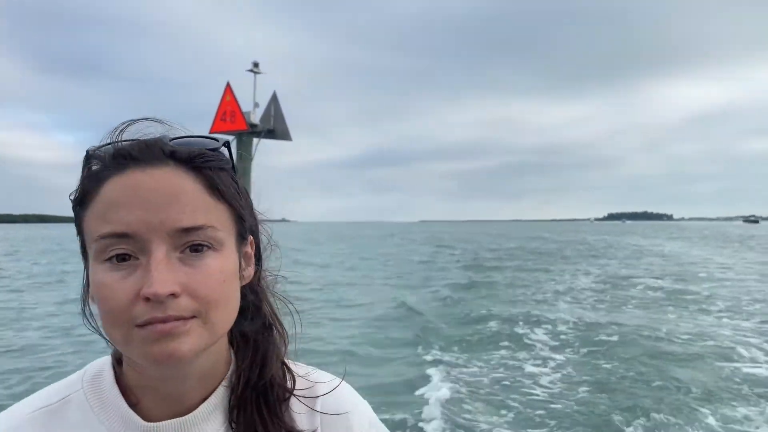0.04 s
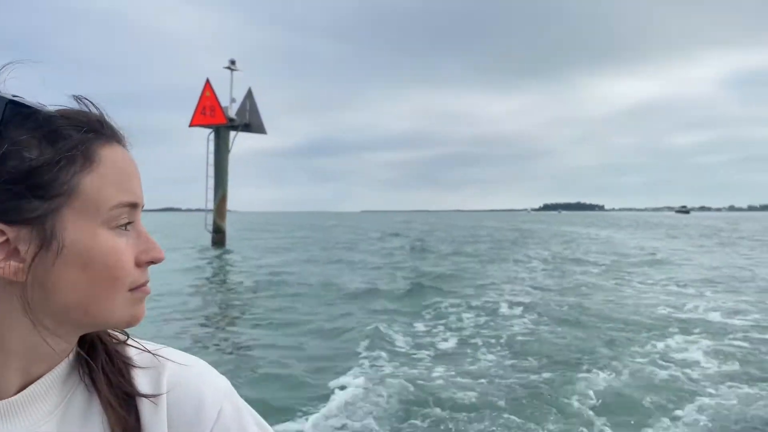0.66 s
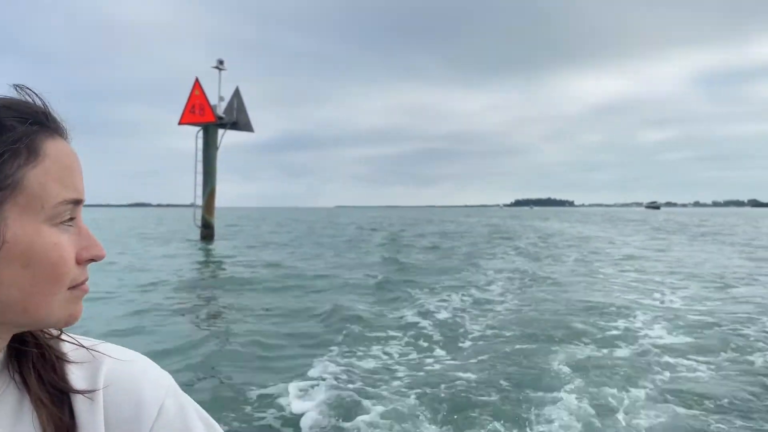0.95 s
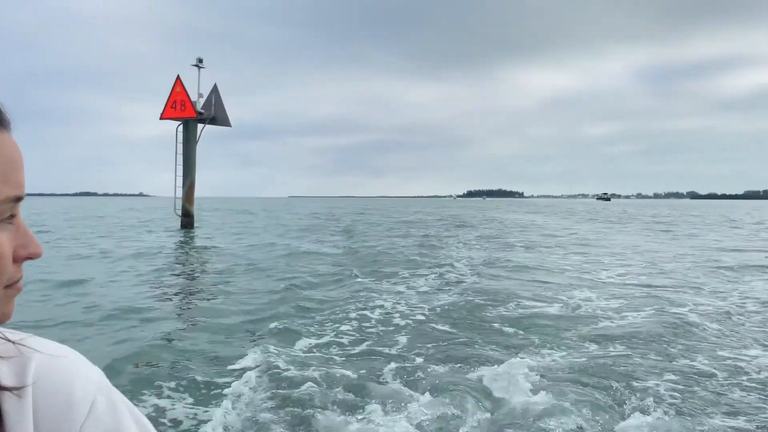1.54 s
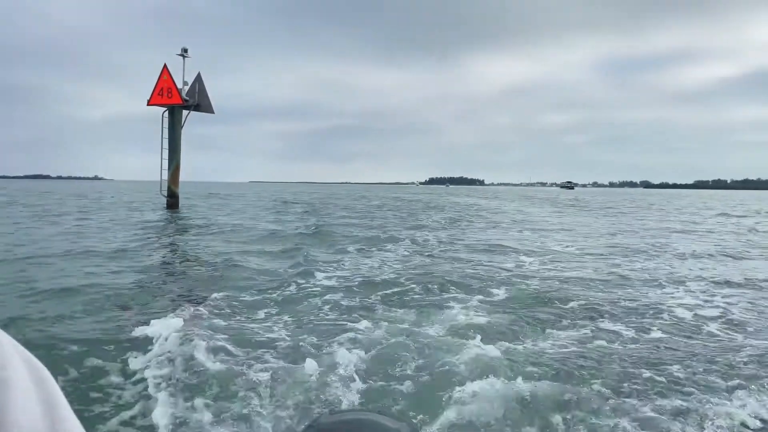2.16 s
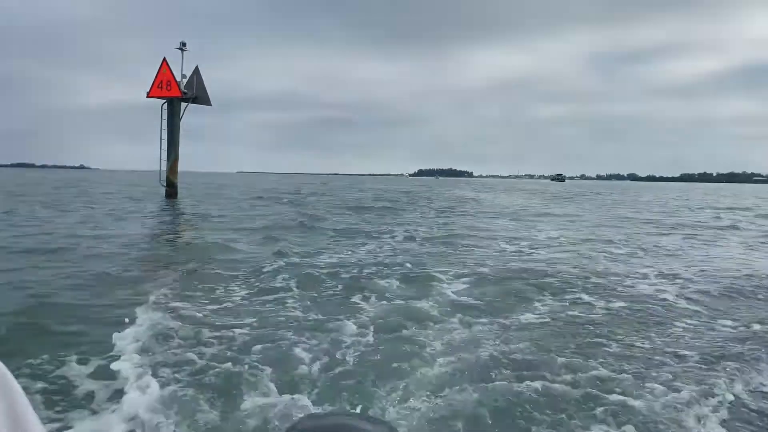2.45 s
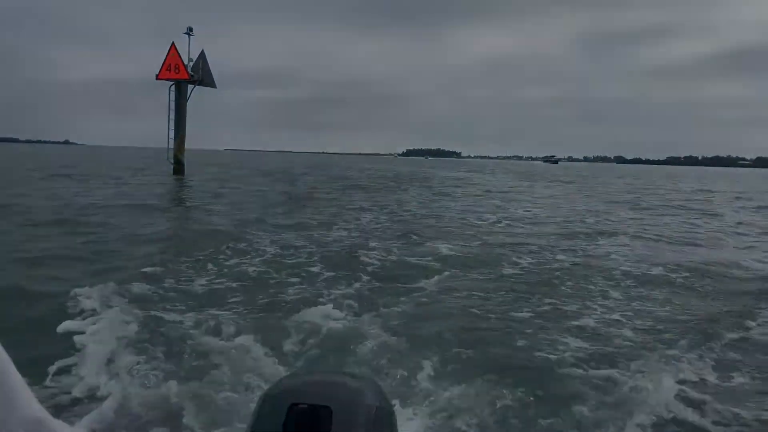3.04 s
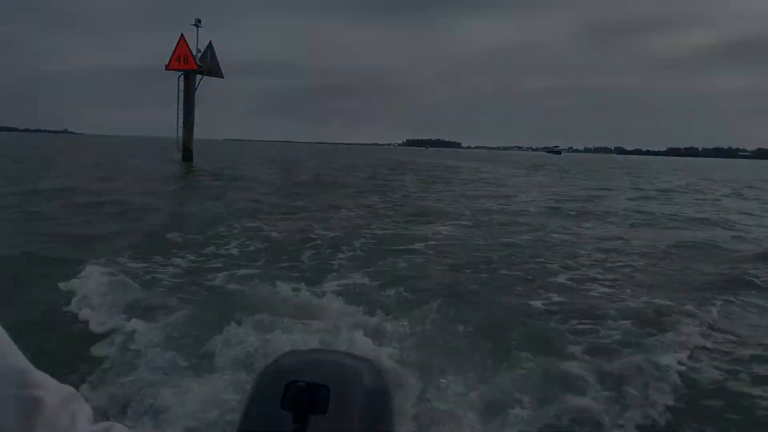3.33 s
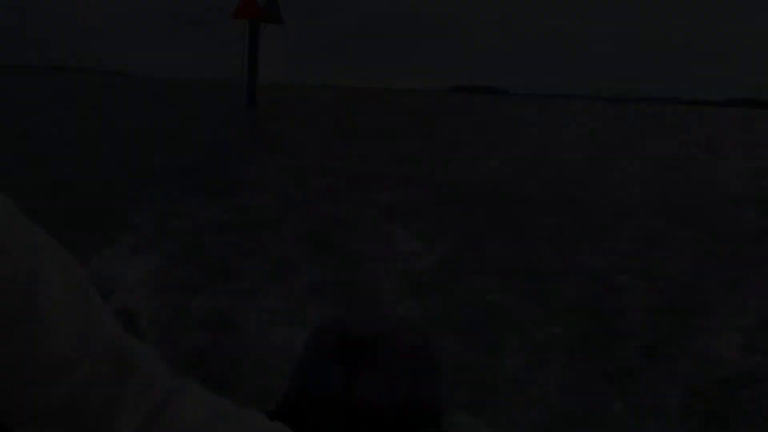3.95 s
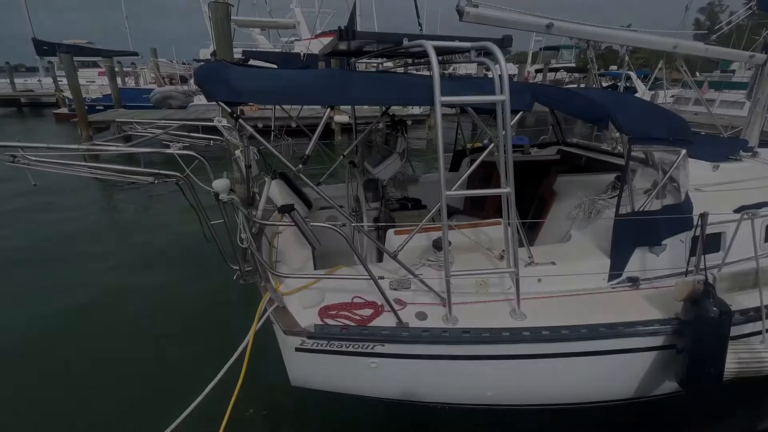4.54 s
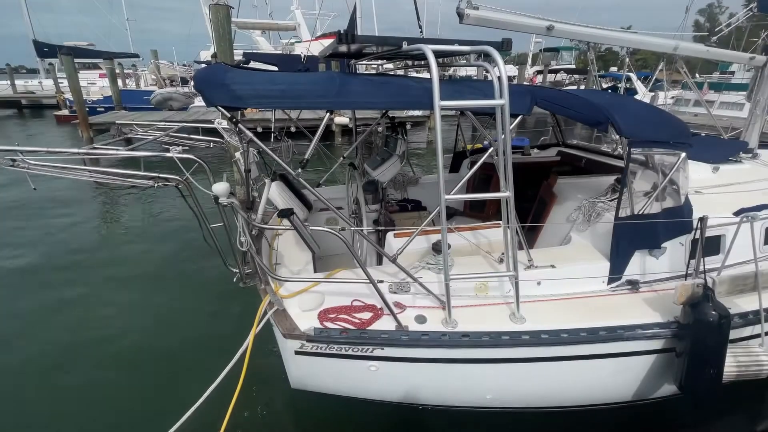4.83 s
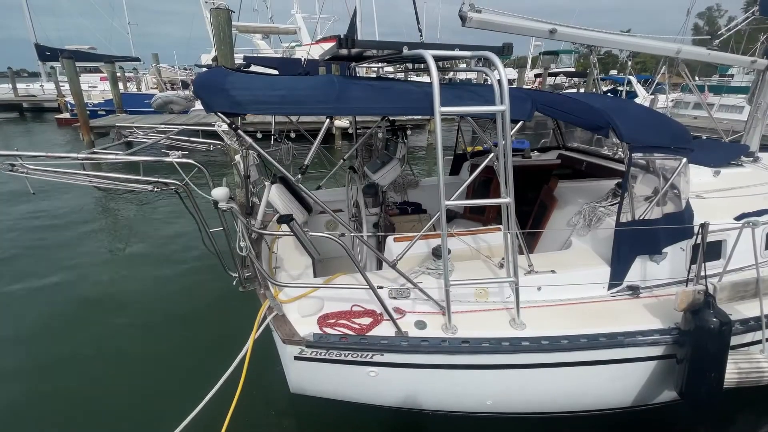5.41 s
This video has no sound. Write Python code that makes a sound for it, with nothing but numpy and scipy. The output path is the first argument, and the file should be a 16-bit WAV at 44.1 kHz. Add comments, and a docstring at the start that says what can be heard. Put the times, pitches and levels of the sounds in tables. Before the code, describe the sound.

A small outboard engine runs at a steady cruising speed, heard close from on board a dinghy. Its exhaust throbs and burbles under a mechanical clatter and faint whine, while the wake churns and spits, wavelets slap the hull and wind softly buffets the microphone. Near the end the ride fades into a quiet marina with a low hum and a few light metal clinks.

```python
"""On board a dinghy, pushed at cruising speed by a small twin-cylinder outboard.
Periodic firing makes the exhaust throb and burble under the stern; valve gear clatters, gears whine and
the shaken cowling growls. Turbulence and ringing bubbles make the wake churn and spit; wind buffets softly.
Wavelets slap the hull. Near the end the ride fades into a quiet marina with a low rumble, a far machine
hum and a few light clinks of metal fittings."""
import sys
import numpy as np
from scipy import signal
from scipy.fft import rfft, irfft, next_fast_len
from scipy.io import wavfile
from scipy.ndimage import uniform_filter1d

SR = 44100
rng = np.random.default_rng(int(sys.argv[2]) if len(sys.argv) > 2 else 0)


def bounce(signal):
    """Save signal as a 16-bit WAV file at the path given by the first command-line argument."""
    frames = np.transpose(np.atleast_2d(signal))
    limited = np.clip(frames, -1, 1)
    pcm = np.round(limited * 32767).astype(np.int16)
    wavfile.write(sys.argv[1], SR, pcm)


N = 246078
T = np.arange(N) / SR

# engine speed; one cycle is two crank turns and two firings: (time [s], cycle rate [Hz])
CYCLE_RATE = [(0.0, 26.47), (0.3, 26.47), (0.5, 26.72), (0.7, 26.85), (1.2, 26.85), (1.45, 26.89),
              (1.65, 26.77), (2.0, 26.77), (2.15, 26.9), (2.5, 27.03), (2.65, 26.78), (2.8, 26.73),
              (3.0, 26.84), (3.25, 26.76), (3.45, 26.92), (3.8, 26.82), (4.05, 26.72), (4.3, 26.78),
              (4.65, 26.9), (4.9, 26.65)]
# rasp of the exhaust's highest orders, which the burble follows: (time [s], level [dB])
RASP_LEVEL = [(0.05, -38.5), (0.35, -34.5), (0.5, -30.5), (0.75, -33.5), (0.97, -32.5), (1.12, -30),
              (1.33, -31.5), (1.5, -34), (1.72, -36), (1.87, -34.5), (2.35, -29.5), (2.75, -32),
              (2.95, -31.5), (3.15, -33), (3.4, -30.5), (3.58, -33.5), (3.75, -30.5), (3.9, -30),
              (4.05, -29.5), (4.25, -30.5), (4.5, -27.5), (4.8, -27)]
# common surge of clatter, growl and propeller churn: (time [s], level [dB])
SURGE_LEVEL = [(0.03, -44), (0.17, -41), (0.5, -42.5), (0.85, -41), (1.0, -39), (1.12, -41), (1.25, -38.3),
               (1.45, -39.5), (1.6, -43), (1.74, -38.8), (2.0, -42.5), (2.15, -40.5), (2.6, -41.5),
               (2.75, -40), (3.1, -39.8), (3.3, -42.5), (3.45, -42.5), (3.6, -41), (3.78, -43),
               (3.95, -40.5), (4.08, -41.3), (4.27, -39), (4.5, -41.5), (4.8, -39.5)]
# level difference between the channels: (frequency [Hz], left minus right [dB])
BALANCE = [(60, 5.5), (100, 2.5), (180, -1.5), (310, 9), (530, 6), (910, -4.5), (1560, -3), (2680, -2),
           (4620, 0), (7950, 0)]
# phase difference between the channels: (frequency [Hz], lead of the left [rad])
PHASE_LEAD = [(0, 0), (430, .2), (750, -.4), (1200, -.4), (1600, .4), (2050, 3.1), (3100, 6.8), (3550, 7.4),
              (4500, 12.5), (6700, 18.85)]


def amp(db):
    """Decibels to amplitude ratio."""
    return 10 ** (np.asarray(db) / 20)


def unit(x):
    """Normalisation to rms 1."""
    return x / np.sqrt(np.mean(x ** 2) + 1e-20)


def curve(points):
    """Linear interpolation of (time [s], value) points at every sample."""
    return np.interp(T, *np.transpose(points))


def read(points, hz):
    """Interpolation of (frequency [Hz], value) points on a logarithmic frequency axis."""
    f, value = np.transpose(points)
    return np.interp(np.log(hz + 1), np.log(f + 1), value)


def ramp(start_s, length_s):
    """A linear rise from 0 to 1."""
    return np.clip((T - start_s) / length_s, 0, 1)


def swell(start_s, length_s):
    """A critically damped envelope: a quick rise to 1 and a slower fall."""
    age = np.maximum(T - start_s, 0) / (length_s / 2)
    return age * np.exp(1 - age)


def burst(cycle, at, width):
    """A smooth periodic pulse; its position and width are fractions of the cycle."""
    return np.exp((np.cos(2 * np.pi * (cycle - at)) - 1) / (2 * np.pi * width) ** 2)


def noise():
    """Two uncorrelated white noises."""
    return rng.standard_normal((2, N))


def wander(rate_hz):
    """A random fluctuation of rms 1, band-limited to about rate_hz."""
    hz = np.fft.rfftfreq(4096, T[-1] / 4096)
    slow = irfft(rfft(rng.standard_normal(4096)) * np.exp(-(hz / rate_hz) ** 2))
    return unit(np.interp(T, np.linspace(0, T[-1], len(slow)), slow))


def strengths(count, spread_db, cap):
    """Random gains whose levels are exponentially distributed, up to cap times spread_db."""
    return amp(spread_db * np.minimum(rng.exponential(1, count), cap))


def add(mix, start_s, sound):
    """Superposition of a stereo sound on the mix."""
    part = mix[:, round(start_s * SR):][:, :sound.shape[1]]
    part += sound[:, :part.shape[1]]


def heard(pair, spectrum):
    """Partly coherent stereo, its mean at rms 1, shaped by (frequency [Hz], relative level [dB]) points."""
    # likeness of left and right: (frequency [Hz], correlation [-1 to 1])
    correlation = [(50, .985), (280, .98), (400, .87), (1050, .87), (1250, .68), (2100, .8), (2450, .3),
                   (2800, .7), (3800, .42), (4500, .78), (6000, .25), (7000, .35), (8200, -.2),
                   (11000, .85)]
    size = next_fast_len(N)
    hz = np.fft.rfftfreq(size, 1 / SR)
    a, b = rfft(pair, size)
    same = read(correlation, hz)
    mid, side = a * np.sqrt(1 + same), b * np.sqrt(1 - same)
    tilt = amp(read(BALANCE, hz) / 2) * np.exp(.5j * read(PHASE_LEAD, hz))
    channels = np.array([(mid + side) * tilt, (mid - side) / tilt])
    out = irfft(channels * amp(read(spectrum, hz)), size)[:, :N]
    return out / np.std(out.mean(0))


def patchy(x, depth_db, width_hz, length_s):
    """Frequency-selective fading: moving water lets patches of the spectrum swell and sink."""
    frame, hop = 512, 128
    spectra = signal.stft(x, nperseg=frame, noverlap=frame - hop)[2]
    field = rng.standard_normal(spectra.shape[1:])
    for axis, span in enumerate((width_hz * frame / SR, length_s * SR / hop)):
        size = max(round(span), 1)
        field = uniform_filter1d(uniform_filter1d(field, size, axis), size, axis)
    gain = unit(amp(depth_db * unit(field)))
    return signal.istft(spectra * gain, nperseg=frame, noverlap=frame - hop)[1][:, :N]


def marina(air_db=-43, rumble_db=-35.5):
    """Ambient noise: broadband harbour air, an uneven rumble and the line spectrum of far machinery."""
    # harbour air and its rumble: (frequency [Hz], relative level [dB])
    air_spectrum = [(25, -25), (110, -12.5), (300, -14.5), (470, -27.5), (650, -29), (800, -22.5),
                    (1000, -21.5), (1300, -24.5), (1530, -36), (1900, -22.5), (2600, -44.5), (3600, -39.5),
                    (6300, -47), (9300, -51.5), (10500, -67.5), (15000, -66.5)]
    rumble_spectrum = [(25, -26), (55, -6), (80, 5), (105, 2), (130, -10), (175, -3), (250, -4.5),
                       (350, -17), (450, -24), (800, -67)]
    # tones of the machinery: (frequency [Hz], level [dB])
    hum_tones = [(51.2, -48.5), (102.3, -38.5), (161.5, -40), (177.6, -48.5), (263.8, -52), (349.9, -55.5),
                 (414.5, -54), (554.5, -63), (818, -64), (1007, -61.5)]
    hum = np.zeros(N)
    for hz, db in hum_tones:
        peak = np.sqrt(2) * amp(db + 2 * wander(3.9))
        hum += peak * np.sin(2 * np.pi * hz * T + .5 * wander(9.4))
    rumble = heard(noise(), rumble_spectrum) * unit(amp(0.5 * wander(14))) * amp([[1], [-1]])
    return amp(air_db) * heard(noise(), air_spectrum) + amp(rumble_db) * rumble + hum


def clinks(crack_t60=0.047, attack_s=0.0014):
    """Impact excitation: a short crack sets the damped modes of a fitting on a moored boat ringing."""
    # modes of each of two metal fittings: (frequency [Hz], relative level [dB], decay time T60 [s])
    fittings = [
        [(3402, -14, .09), (3967, 2.5, .06), (4130, -5, .04), (8300, 1, .04), (8900, -11, .04),
         (9700, -14, .035), (10400, -15, .04)],
        [(5136, -3, .04), (5970, -2.5, .065), (6379, -10, .04), (7700, 3.5, .02), (7989, -1, .04)],
    ]
    # impacts on each fitting: (time [s], level [dB], lower edge of the crack [Hz])
    impacts = [
        [(4.893, -43.5, 2800), (5.02, -59, 3400), (5.056, -60, 3000)],
        [(5.217, -58, 4400), (5.459, -43, 4970)],
    ]
    out, t = np.zeros((2, N)), np.arange(8192) / SR
    bins = np.fft.rfftfreq(len(t), 1 / SR)
    for modes, hits in zip(fittings, impacts):
        for s, db, low_hz in hits:
            band = [(low_hz * 0.62, -22), (low_hz, -1), (8200, 0), (9000, -11), (11000, -18), (15000, -28)]
            colour = amp(read(band, bins)) * np.minimum(bins / low_hz, 1)
            crack = unit(irfft(rfft(rng.standard_normal((2, len(t)))) * colour))
            clink = crack * amp(-60 * t / crack_t60)
            for hz, mode_db, t60 in modes:
                phase = 2 * np.pi * hz * t + rng.uniform(0, np.pi, (2, 1))
                clink += amp(mode_db - 60 * t / t60) * np.sin(phase)
            add(out, s, amp(db) * clink * (1 - np.exp(-t / attack_s)))
    return out


def wind(db=-39.5, gust_db=3.5):
    """Turbulent pressure fluctuations: wind buffets the microphones in soft, low lumps."""
    spectrum = [(12, -32.5), (28, -10.5), (42, -1), (70, -2.5), (150, -13), (500, -62.5)]
    return amp(db + gust_db * wander(43)) * heard(noise(), spectrum)


def slaps():
    """Water impact: each wavelet on a hull is a hollow noise transient about an octave wide."""
    # (time [s], level [dB], length [s], centre frequency [Hz])
    wavelets = [(0.98, -39, 0.04, 620), (1.27, -37, 0.08, 300), (2.29, -34, 0.06, 260),
                (2.69, -36.5, 0.05, 520), (4.15, -34, 0.07, 280), (5.315, -47, 0.038, 420)]
    out = np.zeros((2, N))
    for s, db, length, hz in wavelets:
        hollow = [(hz / 3, -25), (hz / 1.4, -2), (hz * 1.4, 0), (hz * 4, -70)]
        out += amp(db) * swell(s, length) * heard(noise(), hollow)
    return out


def spatter(db=-82, per_s=40):
    """Shot noise: fine drops land close by at random in a faint, bright patter."""
    hits = (rng.random(N) < per_s / SR) * strengths(N, spread_db=5, cap=3)
    return amp(db) * heard(hits * noise(), [(2000, -24), (5000, 9.5), (15000, -9.5)])


def bubble(t, hz, cycles, glide=3, phase=0):
    """Bubble resonance: a sinusoid that rises in pitch and decays by 1/e in the given cycles."""
    return np.exp(-t * hz / cycles) * np.sin(2 * np.pi * hz * t * (1 + glide * t) + phase)


def droplets(per_s=700, sizes=28, tries=600):
    """Random superposition of tiny bubbles, each size ringing at its own resonance."""
    out, t = np.zeros((2, N)), np.arange(1024) / SR
    for hz in np.geomspace(2700, 7500, sizes):
        at = rng.integers(0, N, tries)
        strength = strengths(tries, spread_db=0, cap=3)  # all equally strong
        occurs = rng.random(tries) < per_s * T[-1] / sizes / tries
        train = np.zeros((2, N))
        train[rng.integers(0, 2, tries), at] = strength * occurs
        out += signal.oaconvolve(train, bubble(t, hz, cycles=14)[None], axes=1)[:, :N]
    return unit(out)


def fizz(flicker_db=2):
    """Amplitude-modulated noise and bubble resonances: the finest foam hisses in uneven spits."""
    # (time [s], level [dB])
    foam_level = [(0.1, -62), (0.8, -63.5), (1.0, -58), (1.35, -63), (1.53, -60), (1.8, -61), (2.1, -60),
                  (2.6, -59.5), (3.15, -59), (3.5, -62), (4.15, -62), (4.5, -65)]
    spectrum = [(4500, -30), (5600, -7), (6300, 0), (7000, -1.5), (7600, -13), (8200, -11),
                (9200, -36), (15000, -42)]
    gain = amp(curve(foam_level) + flicker_db * wander(22))
    return gain * heard(noise() + .4 * droplets(), spectrum)


def spray(cycle):
    """Broadband noise of foam and droplets; periodic modulation adds the bright edge of the valve ticks."""
    # (frequency [Hz], relative level [dB])
    spectrum = [(1500, -16), (2300, -26.5), (2700, -8), (3000, -1), (3480, 2.5), (3900, -0.5), (4550, 1),
                (5100, -2.5), (5600, -10.5), (6300, -12), (7000, -15.5), (7600, -23), (8100, -20.5),
                (9200, -45), (15000, -33)]
    # the spray builds, then slowly settles: (time [s], level [dB])
    level = [(0, -49.5), (0.5, -50), (1.2, -48.5), (1.7, -50), (2.2, -51), (2.7, -52.5), (3.2, -50.5),
             (3.85, -53), (4.15, -50.5), (4.8, -51)]
    ticks = 1 + 0.61 * burst(cycle, 0.35, 0.026) + 0.36 * burst(cycle, 0.94, 0.13)
    foam = heard(noise() * ticks + 0.14 * droplets(), spectrum)
    return amp(curve(level)) * patchy(foam, depth_db=1.5, width_hz=350, length_s=0.033)


def splashes():
    """Granular noise transients: each splash off the stern is a quick shower of uneven drops."""
    # (time [s], level [dB], length [s])
    showers = [(.982, -46.5, .014), (1.235, -48.5, .045), (1.423, -47, .018), (1.437, -45, .022),
               (2.098, -47, .045)]
    spectrum = [(2000, -26), (2600, -12), (3150, 1.5), (4600, 1.5), (5600, -10), (7000, -10),
                (9000, -29), (15000, -33)]
    envelope = sum(amp(db) * swell(s, length) for s, db, length in showers)
    return envelope * heard(noise() * strengths(N, spread_db=2, cap=5), spectrum)


def plinks(attack_s=0.00065):
    """Damped resonances: each drop traps a resonating bubble that plinks, and wavelets knock short, low notes
    from the hull."""
    # (time [s], level [dB], frequency [Hz], decay [cycles]); the rows below 1.3 kHz are wavelet knocks on the
    # hull
    rings = [(.357, -35, 3060, 5.9), (.433, -39, 4400, 12), (.768, -34, 4550, 13), (.986, -47, 4380, 11),
             (1.205, -35, 3520, 12), (1.4025, -30, 4620, 12), (1.553, -39, 7200, 14),
             (2.0705, -21, 700, 1.3), (2.074, -18.5, 1220, 1.9), (2.195, -37, 4450, 13),
             (3.211, -17.5, 1050, 1.9), (3.271, -31, 3260, 7.2)]
    out, t = np.zeros((2, N)), np.arange(2048) / SR
    for s, db, hz, cycles in rings:
        lead = read(PHASE_LEAD, hz) * np.array([[.5], [-.5]])
        add(out, s, amp(db) * bubble(t, hz, cycles, phase=lead) * (1 - np.exp(-t / attack_s)))
    return out


def gurgles(per_s=90, sizes=20, tries=300):
    """Larger bubbles resonate lower: each is a short rising note in the propeller wash."""
    out, t = np.zeros(N), np.arange(4096) / SR
    for hz in np.geomspace(450, 1800, sizes):
        at = rng.integers(0, N, tries)
        strength = strengths(tries, spread_db=3, cap=2)
        occurs = rng.random(tries) < per_s * T[-1] / sizes / tries
        train = np.zeros(N)
        train[at] = strength * occurs
        ring = hz * (1 - np.exp(-t * hz / 2)) * bubble(t, hz, cycles=11, glide=2.5)
        out += signal.oaconvolve(train, ring)[:N]
    return unit(out)


def churn(gain_db=2.3, bubbles_db=-5):
    """Turbulence noise: the propeller tears up the water in quick lumps and gurgles."""
    # (frequency [Hz], relative level [dB])
    spectrum = [(200, -10), (450, -0.5), (520, -6), (680, -2), (780, -7.5), (1030, -3.5), (1500, -14.5),
                (1750, -8), (2050, -19.5), (2600, -25.5), (4000, -54.5)]
    bubbles = heard(np.array([gurgles(), gurgles()]), spectrum)
    wash = patchy(heard(noise(), spectrum), depth_db=1.3, width_hz=300, length_s=0.02)
    return amp(curve(SURGE_LEVEL) + gain_db) * (wash + amp(bubbles_db) * bubbles)


def whine(cycle, order=40, tone_db=-6, resonance_db=-6.5):
    """Gear meshing: a fluttering tone at one engine order, and a cowling resonance that swells with it."""
    # the whine under changing load: (time [s], level [dB])
    level = [(0.5, -61), (0.9, -42), (1.45, -41.5), (1.58, -51), (1.69, -40), (1.85, -48), (2.8, -41.5),
             (3.07, -37.5), (3.3, -44.5), (4.25, -41), (4.7, -44)]
    tone = np.cos(2 * np.pi * order * cycle + wander(18)) * amp([[-2], [2]])
    band = [(850, -39), (980, 3), (1050, 5.5), (1100, -2.5), (1200, -42.5), (2500, -65.5)]
    return amp(curve(level)) * (amp(tone_db) * tone + amp(resonance_db) * heard(noise(), band))


def partials(cycle, orders, flutter_rad, waver_db):
    """Harmonics of the engine cycle in stereo, each with its own amplitude and phase modulation."""
    out, sides = np.zeros((2, N)), np.array([[.5], [-.5]])
    for order, db in orders:
        hz = order * np.mean(CYCLE_RATE, axis=0)[1]
        phase = 2 * np.pi * (order * cycle + rng.random()) + flutter_rad * wander(13)
        gain = amp(db + waver_db * wander(5.7) + sides * read(BALANCE, hz))
        out += gain * np.cos(phase + sides * read(PHASE_LEAD, hz))
    return out


def growl(cycle, gain_db=-0.5):
    """Forced vibration: the block shakes the cowling at engine orders; one panel buzzes on and off."""
    # cowling and panel: (order [multiple of the cycle rate], relative level [dB])
    cowling_orders = [(22, -13.5), (24, -12), (26, -10.5), (27, -12.5), (30, -9), (32, -9.5), (34, -16),
                      (36, -14), (37, -11.5), (38, -8.5), (39, -13.5), (41, -10.5), (42, -12.5),
                      (44, -14.5), (46, -17.5), (48, -17), (62, -19.5), (64, -19.5), (66, -18.5)]
    panel_orders = [(51, -12.5), (52, -2), (54, -3.5)]
    # (time [s], level [dB])
    panel_level = [(0.1, -46), (0.45, -55.5), (0.8, -48), (1.35, -52.5), (1.7, -54), (2.0, -47.5),
                   (2.6, -59), (3.45, -52), (3.8, -52), (4.15, -57), (4.4, -41.5), (4.8, -47.5)]
    cowling_gain = amp(curve(SURGE_LEVEL) + gain_db + 1.5 * wander(5))
    cowling = partials(cycle, cowling_orders, flutter_rad=0.81, waver_db=1.5)
    panel = partials(cycle, panel_orders, flutter_rad=0.67, waver_db=3.5)
    return cowling_gain * cowling + amp(curve(panel_level)) * panel


def clatter(cycle, gain_db=-0.5):
    """Periodic impacts: gears and valves strike at set crank angles and excite the cowling's resonances."""
    # response of the cowling: (frequency [Hz], relative level [dB])
    response = [(400, -25.5), (750, -10), (880, -1.5), (1050, -5.5), (1250, -5), (1400, -10), (1560, -11.5),
                (1750, -9.5), (2050, -13), (2600, -35), (4000, -61.5)]
    angles = np.linspace(0, 1, 1600)
    blows = np.zeros((2, N))
    for pattern in rng.standard_normal((4, 2, len(angles))):  # repeating patterns in a drifting blend
        blows += wander(2.1) * np.array([np.interp(cycle % 1, angles, row) for row in pattern])
    valves = 1 + 1.6 * (burst(cycle, 0.38, 0.034) + 0.41 * burst(cycle, 0.94, 0.13))
    rattle = heard((unit(blows) + 1.26 * noise()) * valves, response)
    return amp(curve(SURGE_LEVEL) + gain_db) * patchy(rattle, depth_db=2, width_hz=400, length_s=0.11)


def burble(cycle, gain_db=-3):
    """Pulsating flow noise: gas breaks out of the water in gulps, strongest on one cylinder's firing."""
    # (frequency [Hz], relative level [dB])
    spectrum = [(20, -24), (45, 3.5), (80, 10.5), (130, -0.5), (190, 6), (250, 4), (320, 4.5), (380, -6),
                (500, -21), (900, -61.5)]
    gulps = 0.19 + 0.14 * burst(cycle, 0.02, 0.17) + 2 * burst(cycle, 0.7, 0.18)
    return amp(curve(RASP_LEVEL) + gain_db) * heard(noise() * gulps, spectrum)


def pitching():
    """Slow modulation, in dB: each wave under the stern lowers the boom and shifts the ring above it."""
    # (middle time [s], length [s], sink of the boom [dB], lift of the ring [dB])
    waves = [(0.6, 0.67, 18, 5), (1.774, 0.26, 18, -8), (2.187, 0.71, 12, 5.5), (2.875, 0.66, 6.5, 3),
             (3.377, 0.33, 10.5, 4.5), (3.691, 0.25, 17, 8)]
    return sum(np.outer([-sink_db, lift_db], np.sin(np.pi * ramp(s - length / 2, length)) ** 2)
               for s, length, sink_db, lift_db in waves)


def exhaust(cycle, firing_db=-23.5, ring_offset_db=-8.5, jitter_s=0.000093):
    """Fourier series of the firing pulses; the leg's resonances delay the upper orders, so each rings on."""
    # (order [multiple of the cycle rate], relative level [dB])
    orders = [(2, -0.5), (3, -27), (4, -2.5), (5, -19.5), (6, -8), (7, -13), (8, -5), (9, -9), (10, 2),
              (11, -2), (12, -1), (14, -11.5), (16, -13.5), (18, -28.5), (20, -21.5)]
    # resonances of the exhaust's path through the leg: (frequency [Hz], bandwidth [Hz])
    resonances = [(150, 160), (220, 40)]
    # low throb, hull boom and exhaust drone: (time [s], level [dB])
    throb_level = [(0.15, -22.5), (0.45, -24.5), (0.6, -23), (1.1, -23.5), (1.73, -22), (1.8, -38),
                   (1.87, -22), (2.3, -24.5), (2.55, -22), (2.9, -24.5), (3.4, -22), (3.62, -19.5),
                   (3.85, -23), (4.25, -21.5), (4.6, -24), (4.9, -20)]
    boom_level = [(0, -20.5), (1.1, -19.5), (1.5, -19.5), (3.301, -20), (4.3, -18.5), (4.8, -19.5)]
    drone_level = [(0.05, -29), (0.23, -31), (0.34, -21), (0.52, -31), (0.65, -26.5), (1.24, -31.5),
                   (1.35, -24), (1.74, -33), (1.91, -31.5), (1.94, -32), (2.05, -26.5), (2.36, -26.5),
                   (2.39, -32), (3.0, -24.5), (3.09, -33), (3.21, -28), (3.91, -28), (4.3, -25.5)]
    boom_db, ring_db = curve(boom_level) + pitching()
    band_db = (curve(throb_level), firing_db, boom_db, ring_db + ring_offset_db,
               curve(drone_level), curve(RASP_LEVEL))
    band_starts = [3, 6, 7, 9, 11]  # lowest order of each band above the throb
    strength = 1 + 0.14 * wander(21)  # no two firings are equally strong
    late_s = jitter_s * wander(38)  # nor do they leave the water evenly
    out = np.zeros(N)
    for order, db in orders:
        hz = order * np.mean(CYCLE_RATE, axis=0)[1]
        lag = sum(np.arctan2(hz * width, centre ** 2 - hz ** 2) for centre, width in resonances)
        odd = order % 2  # moving water shakes the high and the weak odd orders most
        waver_db = (2.14 if odd or order > 10 else 0.9) * wander(10)
        smear = (hz / 1600 + 0.97 * odd * (order < 10)) * wander(5)
        gain = amp(band_db[np.digitize(order, band_starts)] + db + waver_db)
        phase = 2 * np.pi * (order * cycle - hz * late_s) - lag + smear
        out -= gain * np.cos(phase) * (strength if order > 5 else 1)
    return out * amp([[-.25], [.25]])


def scene(fade_start_s=4.185, ride_floor=0.064):
    """Superposition of engine, water and wind, cross-faded into the marina; a trace of the ride lingers."""
    cycle = np.cumsum(curve(CYCLE_RATE)) / SR
    engine = exhaust(cycle) + burble(cycle) + clatter(cycle) + growl(cycle) + whine(cycle)
    water = churn() + spray(cycle) + fizz() + splashes() + plinks() + spatter()
    ride = (engine + water + wind()) * np.maximum(1 - ramp(fade_start_s, 1), ride_floor)
    return ride + marina() * ramp(fade_start_s, 0.95) + clinks() + slaps()


def record(dry, cutoff_hz=15300):
    """Band limiting by a linear-phase low-pass filter."""
    lowpass = signal.firwin(511, cutoff_hz, window=("kaiser", 9), fs=SR)
    return signal.oaconvolve(dry, lowpass[None], "same")


dry = scene()
out = record(dry)
bounce(out)
```